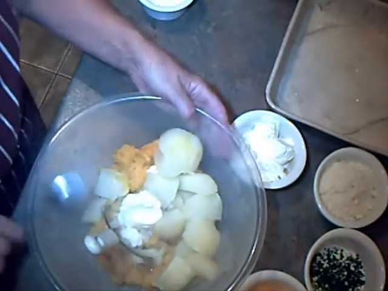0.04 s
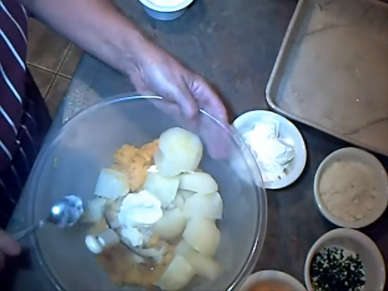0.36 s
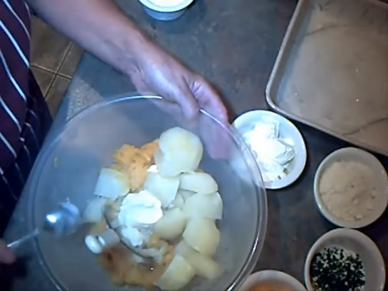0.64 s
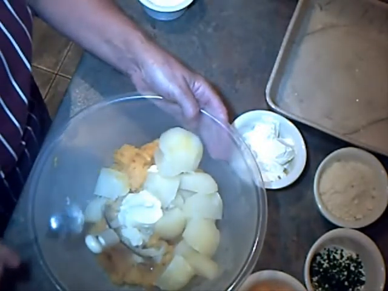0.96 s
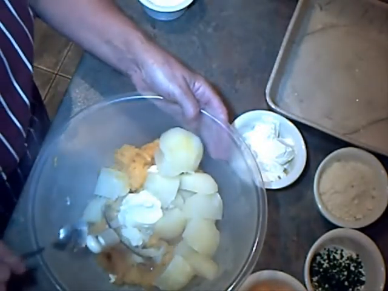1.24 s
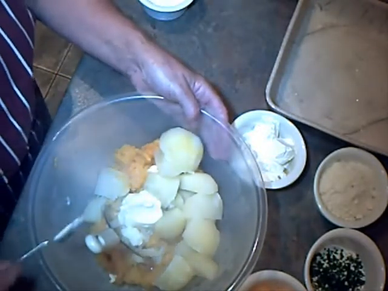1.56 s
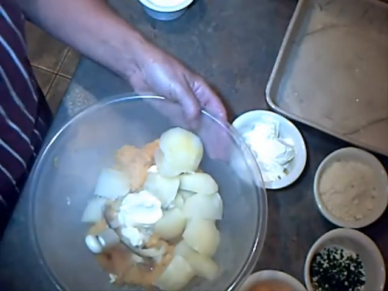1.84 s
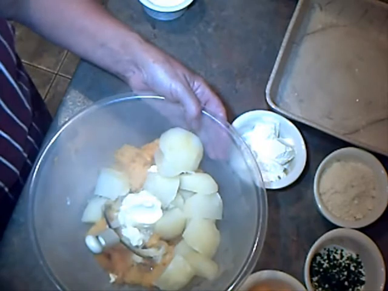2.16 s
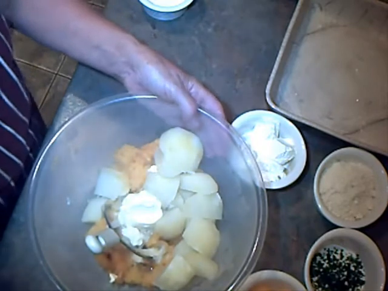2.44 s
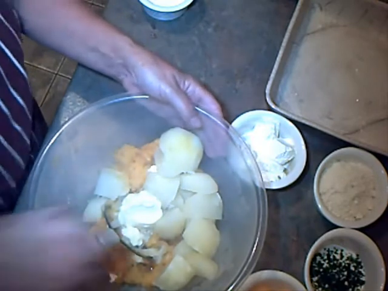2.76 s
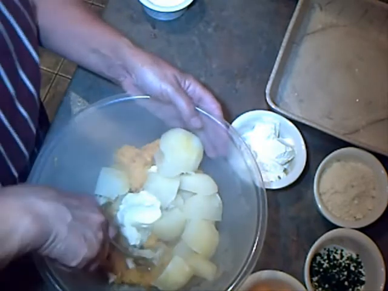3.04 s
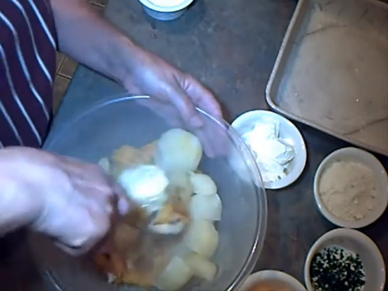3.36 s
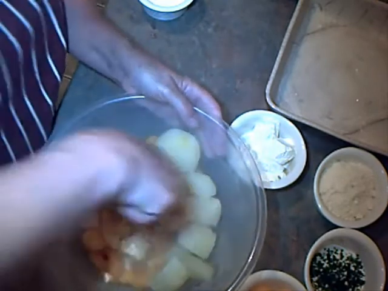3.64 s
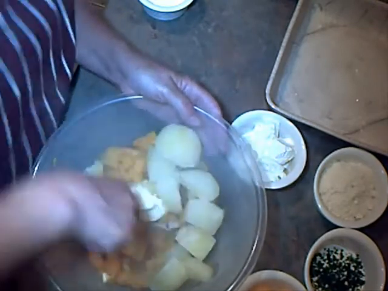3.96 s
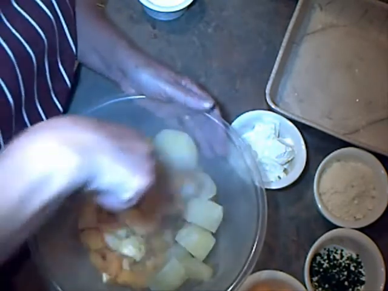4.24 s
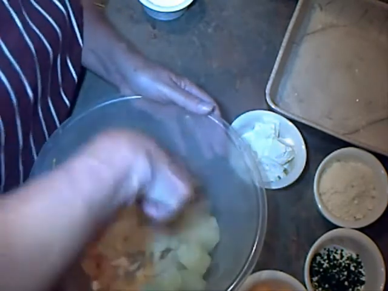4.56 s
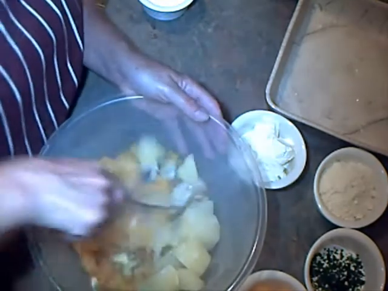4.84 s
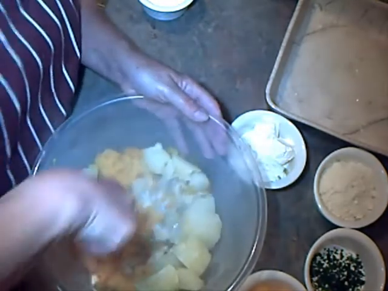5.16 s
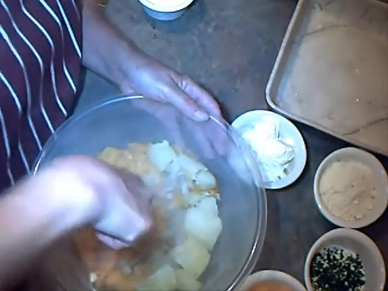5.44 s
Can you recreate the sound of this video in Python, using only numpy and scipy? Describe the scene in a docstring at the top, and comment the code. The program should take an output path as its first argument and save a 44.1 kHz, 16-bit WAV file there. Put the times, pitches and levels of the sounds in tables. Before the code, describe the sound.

In a small, live kitchen, a metal spoon raps seven times on a big glass bowl, its ring damped by boiled vegetables. A faint, thin high whistle follows, then the spoon clacks onto the counter and bounces to rest. A masher squashes the vegetables with soft wet crackles and pops, sometimes knocking the glass. The microphone is close above the bowl, with air noise and a faint appliance hum behind.

```python
"""Seven raps of a spoon ring a big glass bowl, damped by the boiled vegetables inside it.
A thin high whistle sounds once, then the spoon is laid on the counter and bounces to rest.
A masher squashes the vegetables with wet crackles and pops of trapped air, now and then
knocking the bowl. The kitchen is small and live; behind it all are soft low bumps,
steady air noise and the faint hum of an appliance."""
import sys
import numpy as np
from scipy import signal
from scipy.fft import rfft, irfft
from scipy.io import wavfile
from scipy.ndimage import uniform_filter1d

SR = 44100
rng = np.random.default_rng(int(sys.argv[2]) if len(sys.argv) > 2 else 0)


def pcm_store(signal):
    """Save signal as 16-bit PCM."""
    levels = np.round(np.clip(np.atleast_2d(signal), -1, 1) * 32767)
    wavfile.write(sys.argv[1], SR, levels.astype(np.int16).T)


N = 242550
TIME = np.arange(N) / SR


# The spoon's rhythm. Each row: start in seconds, relative strength in dB, low register boost in dB.
SPOON_RAPS = [(0.3058, -3, 4.5), (0.5830, -3.5, 6), (0.772, -8.5, 2), (0.9347, -3.3, 2.5),
              (1.098, -8.5, 2.5), (1.2426, -2.5, 3), (1.3815, -7.5, 3.5)]


def spoon_raps():
    """The spoon strikes the glass with a short contact; harder raps are brighter."""
    blows = [(s, db, low_db, 0, -2, -8.5 + 0.37 * db) for s, db, low_db in SPOON_RAPS]
    return bowl(blows, strength_db=15.0, rise_s=0.0011, fall_s=0.0036, scatter_db=2.0, blur=1.5)


# The voice of the loaded, hand-held bowl. Each row: pitch in Hz, width in Hz, relative level in dB.
BOWL_MODES = [(146, 57.4, 8), (560, 110, 20), (626.5, 80.2, 33.5), (838.6, 131, 21.5), (908.2, 41, 26.5),
              (1256, 151, 20), (1530, 112, 17), (1766, 73, 17.5), (1998, 168, 13), (2232, 105, 19),
              (2419, 91, 25.5), (2665, 102, 17.5), (2880, 90, 13), (2980, 143, 8), (3215, 96, 5.5),
              (4436, 390, -1.5), (4740, 750, 2.5), (6005, 120, 7.5), (6490, 560, 9.5), (8510, 820, 9),
              (9600, 436, 7.5), (10750, 330, -4.5)]
# Edges in Hz of the low, middle, upper and treble registers; the place of contact sets their balance.
REGISTER_EDGES_HZ = [0, 900, 2000, 4500, 12000]
# How the modes answer a blow deep in the bowl. Each row: frequency in Hz, boost or cut in dB.
DEEP_BLOW_COLOUR = [(150, 3.5), (480, 3), (650, 0), (800, -11.5), (1150, 10), (1550, -5.5), (1760, -0.5),
                    (2000, 6), (2400, 5.5), (2800, -9), (4000, 6), (8000, 6)]


def bowl(blows, strength_db, rise_s, fall_s, scatter_db, blur, deep=False):
    """Each blow rings the bowl's damped modes; returns the sound sent to the microphone and walls."""
    direct, to_walls = np.zeros(N), np.zeros(N)
    hz, width, mode_db = np.transpose(BOWL_MODES)
    mode_db = mode_db + (at_hz(DEEP_BLOW_COLOUR, hz) if deep else 0)
    register = np.digitize(hz, REGISTER_EDGES_HZ) - 1
    # neighbouring modes swing in opposite directions, so the knock swells for a moment
    polarity = (-1) ** np.arange(len(hz))
    for s, blow_db, *register_db in blows:
        force = contact(rise_s, fall_s)
        gains = polarity * from_db(mode_db + scatter_db * rng.standard_normal(len(hz)))
        # summed over all directions, the bowl's peaks are broader
        for track, widths in (direct, width), (to_walls, width * blur):
            rings = np.array([g * resonance(force, f, w) for f, w, g in zip(hz, widths, gains)])
            knock = sum(from_db(db) * unit(rings[register == k].sum(axis=0))
                        for k, db in enumerate(register_db))
            add(track, s - .02, from_db(blow_db + strength_db) * unit(knock))
    return np.array([direct, to_walls])


def contact(rise_s, fall_s, grit=3.0, passes=6):
    """A click inside a brief gritty slide, about equally strong at all pitches; it peaks 20 ms in."""
    t = TIME[:SR // 8] - 0.02
    touch = np.exp(-(t / np.where(t < 0, rise_s, fall_s)) ** 2)
    slide = np.diff(rng.standard_normal(len(t)), prepend=0) * touch
    force = (t == 0) + grit * unit(slide)
    for _ in range(passes):
        # even out the spectrum while the force stays confined to the time of touch
        spectrum = rfft(force)
        force = irfft(spectrum / (np.abs(spectrum) + 1e-9), len(t)) * touch ** (1 / passes)
    return force


# The spoon's landing and bounces. Each row: start in seconds, relative strength in dB.
SPOON_BOUNCES = [(2.6445, 1.5), (2.652, -3), (2.680, -4.5), (2.687, -8), (2.704, -17), (2.712, -13)]
# The ring of the steel. Each row: pitch in Hz, relative level in dB, seconds to fall 60 dB.
SPOON_MODES = [(467.7, 1, 0.12), (1287, -11, .09), (1940, -2.5, 0.17), (2474, 1.5, 0.069),
               (4420, -16.5, 0.066), (5380, -17.5, 0.088), (5830, -3.5, 0.089), (6400, -5, 0.12),
               (7700, -5, .1), (8570, -11, 0.084), (8732, -3, .1), (9840, 1, 0.16), (11000, -5, 0.19)]
# The tone of the clack on the counter. Each row: frequency in Hz, relative level in dB.
CLACK_COLOUR = [(100, -33), (300, -11), (550, 3), (950, -2), (1350, 7.5), (1700, -8), (2150, -9.5),
                (2500, 4.5), (3700, -3.5), (6100, 1), (8600, 3), (9700, -1), (10300, -10), (11500, -19)]


def spoon_laid_down(clack_db, clack_t60, ring_db):
    """The spoon bounces to rest; every touch clacks and sets the steel ringing."""
    out, t = np.zeros(N), TIME[:SR // 2]
    hz, mode_db, t60 = np.transpose(SPOON_MODES)[:, :, None]
    for s, touch_db in SPOON_BOUNCES:
        clack = unit(coloured(rng.standard_normal(len(t)), CLACK_COLOUR) * dying(t, clack_t60))
        gains = from_db(mode_db + 2 * rng.standard_normal(hz.shape))
        phase = 2 * np.pi * (hz * t + rng.random(hz.shape))
        ring = np.sum(gains * np.sin(phase) * dying(t, t60), axis=0)
        add(out, s, from_db(touch_db) * (from_db(clack_db) * clack + from_db(ring_db) * ring))
    return out


# The masher hitting glass. Each row: start in seconds, relative strength in dB,
# low and upper register levels in dB against the middle one.
MASHER_KNOCKS = [(3.3146, -43.5, -4, -8), (3.3395, -38.5, -22, -10), (3.916, -22.5, -4, -4.5),
                 (3.952, -31, -6, -18), (4.155, -41, -12, -14), (4.6225, -31, -3.5, -13.5),
                 (4.707, -27, -4.5, 6), (4.7176, -40, -14, 11), (4.772, -38.5, 21, 0),
                 (5.236, -48, -5, -18), (5.301, -46.5, -11, -1), (5.3964, -45, -23, -1),
                 (5.4296, -34, 1, -13)]


def masher_knocks():
    """The masher strikes deep in the bowl, with a longer contact and little treble."""
    blows = [(s, db, low_db, 0, upper_db, -20.5) for s, db, low_db, upper_db in MASHER_KNOCKS]
    return bowl(blows, strength_db=15.5, rise_s=0.0018, fall_s=0.0058,
                scatter_db=3.5, blur=3.1, deep=True)


# The pushes. Each row: moment of greatest pressure in seconds, relative squash and crackle levels in dB.
MASHER_PUSHES = [(3.11, -70.5, -69), (3.355, -62.5, -64), (3.69, -69, -65), (3.924, -51.5, -60),
                 (4.25, -86, -69.5), (4.614, -59.5, -60), (4.72, -58, -63.5), (4.92, -61.5, -69.5),
                 (5.219, -75, -65.5), (5.41, -60.5, -59)]
# The tones of the soft squash and the bright crackle. Each row: frequency in Hz, relative level in dB.
SQUASH_COLOUR = [(200, -11), (450, -4), (700, -6.5), (1150, -6.5), (1700, -9.5), (2400, -4.5), (3300, -13),
                 (6000, -24.5)]
CRACKLE_COLOUR = [(1500, -32), (3500, -7.5), (6000, -11), (9500, -6), (11500, -13)]
MASHING_FROM_S = 3.0


def mash():
    """Soft flesh tears under the masher while its wet skin crackles; the crackle stops sooner."""
    push_s, squash_db, crackle_db = np.transpose(MASHER_PUSHES)
    squash = coloured(wet_grains(446, 3100, per_s=1800, spread_db=4.0, sharpness=2.3), SQUASH_COLOUR)
    crackle = coloured(wet_grains(3000, 10800, per_s=500, spread_db=3.0, sharpness=7.0), CRACKLE_COLOUR)
    squash *= pressure(push_s, squash_db, stir_db=-76, release_s=0.093)
    crackle *= pressure(push_s, crackle_db, stir_db=-77, release_s=0.039)
    return squash + crackle


def wet_grains(lowest_hz, highest_hz, per_s, spread_db, sharpness, count=12):
    """Each tiny cavity that opens in the mash rings briefly at a pitch of its own."""
    pitches = np.geomspace(lowest_hz, highest_hz, count)
    return sum(resonance(clicks(per_s / count, spread_db), hz, hz / sharpness) for hz in pitches)


def clicks(per_s, spread_db):
    """Tiny clicks of uneven size that come in clumps."""
    born = rng.random(N) < per_s * from_db(4 * drift(60)) / SR
    return born * rng.choice([-1, 1], N) * from_db(spread_db * np.minimum(rng.exponential(1, N), 4))


def pressure(push_s, peaks_db, stir_db, release_s, swell_s=0.055):
    """Gain that builds up to each push and relaxes, over the quiet stirring in between."""
    power = from_db(stir_db) ** 2 * (TIME > MASHING_FROM_S)
    for s, db in zip(push_s, peaks_db):
        push = np.exp(-np.abs(TIME - s) / np.where(TIME < s, swell_s, release_s))
        power = power + (from_db(db) * push) ** 2
    return np.sqrt(power)


# The biggest air pockets. Each row: start in seconds, peak level in dB, pitch in Hz.
BIG_POPS = [(3.457, -50, 5770), (4.245, -46, 7700), (4.360, -47, 5740), (4.623, -39, 6900),
            (4.719, -29.5, 3820), (4.766, -37.5, 8360), (5.014, -45, 7450), (5.042, -41, 9530),
            (5.411, -40, 6400)]


def air_pops(t60, width_hz, small_per_s, small_db, count=40):
    """Trapped air spits out of the mash in short squirts; small pockets pop at random."""
    out, t = np.zeros(N), TIME[:SR // 16]
    starts = random_times(small_per_s, MASHING_FROM_S)
    small = [(s, small_db, hz) for s, hz in zip(starts, rng.uniform(4500, 9100, count))]
    for (s, peak_db, hz), air in zip(BIG_POPS + small, rng.standard_normal((count, len(t)))):
        spit = resonance(air * dying(t, t60), hz, width_hz)
        add(out, s, from_db(peak_db) * spit / np.abs(spit).max())
    return out


def counter_shake(at_s, length_s, hz, level_db, rumble_db):
    """The hardest push makes the counter shudder."""
    swell = np.exp(-((TIME - at_s) / length_s) ** 2)
    rumble = coloured(rng.standard_normal(N), [(25, 0), (60, -18), (200, -35), (1000, -70)])
    return swell * (from_db(level_db) * np.sin(2 * np.pi * hz * TIME) + from_db(rumble_db) * rumble)


# The whistle's glide. Each row: time in seconds, pitch in Hz, relative level in dB.
WHISTLE_GLIDE = [(1.549, 5800, -74), (1.595, 6500, -65.5), (1.62, 7100, -77), (1.685, 6820, -69.5),
                 (1.781, 7000, -81), (1.849, 6600, -64), (1.92, 6280, -66), (1.98, 6680, -73.5),
                 (2.06, 7150, -82)]


def whistle(level_db, waver_hz, flutter_db):
    """One thin, faint tone that glides and wavers."""
    s, hz, db = np.transpose(WHISTLE_GLIDE)
    pitch = np.interp(TIME, s, hz) + waver_hz * drift(200)
    gain = np.interp(TIME, s, from_db(db), left=0, right=0) * from_db(level_db + flutter_db * drift(49))
    return np.sqrt(2) * gain * np.sin(2 * np.pi * np.cumsum(pitch) / SR)


def near_echoes(x, t60, lowest_hz):
    """The bowl's wall and the dishes around it scatter the short waves back within a few ms."""
    t = TIME[:SR // 16]
    highpass = signal.butter(2, lowest_hz, "high", fs=SR, output="sos")
    scatter = signal.sosfilt(highpass, rng.standard_normal(len(t)))
    return signal.fftconvolve(x, unit(scatter * dying(t, t60) * (t > 0.001)))[:N]


# The length of the kitchen's reverb. Each row: frequency in Hz, seconds to fall 60 dB.
REVERB_T60 = [(100, 0.34), (600, 0.23), (2000, 0.26), (6000, 0.24), (11000, 0.23)]
# Its tone. Each row: frequency in Hz, boost or cut in dB.
REVERB_COLOUR = [(100, -1.5), (250, 1.5), (390, -3), (550, -4.5), (700, -4.5), (1000, -7), (1600, -4),
                 (2400, -7.5), (3800, 0.5), (7000, -1.5), (11000, 1.5)]


def kitchen_response(first_echo_s, build_up_s, smooth_hz):
    """Dense wall echoes that start after a few ms and linger longest in the bass."""
    t, hz = TIME[:SR], np.arange(SR // 2 + 1)
    white, tail = rfft(rng.standard_normal(SR)), 0
    edges = np.geomspace(50, 12800, 9)
    for low, high in zip(edges, edges[1:]):
        band = irfft(white * (hz >= low) * (hz < high), SR)
        tail = tail + band * dying(t, at_hz(REVERB_T60, np.sqrt(low * high)))
    onset = np.clip((t - first_echo_s) / build_up_s, 0, 1)
    spectrum = rfft(tail * onset)
    # a diffuse field carries about the same power in neighbouring bands
    power = uniform_filter1d(np.abs(spectrum) ** 2, smooth_hz)
    even = spectrum / np.sqrt(power + power.mean() / 1000)
    response = irfft(even * from_db(at_hz(REVERB_COLOUR, hz)), SR) * (t > first_echo_s)
    return response[:SR * 2 // 3]


# The slow ring of the bowl on the counter. Each row: pitch in Hz, width in Hz, relative level in dB.
COUNTER_RING_MODES = [(162.7, 18, 7.5), (231, 2, -12), (212, 2.7, 20), (255.8, 10.8, 26), (273, 8.3, 18.5),
                      (538, 11.6, 2), (633.6, 22.5, -1), (734, 6.6, -3), (753, 8.3, 1), (840, 10.7, 3.5),
                      (937, 8.9, -9), (1203, 39, -1.5)]


def counter_ring(x, lag_s):
    """The bowl's slow low modes ring on against the counter after each knock."""
    late = np.interp(TIME - lag_s, TIME, x, left=0)
    return sum(from_db(db) * resonance(late, hz, width) for hz, width, db in COUNTER_RING_MODES)


def bumps(per_s, level_db, spread_db, hz, length_s):
    """Dull bumps at random moments: a short dip in pressure and a swing back."""
    out, t = np.zeros(N), TIME[:SR // 16]
    bump = -np.sin(2 * np.pi * hz * t) * np.exp(-(t / length_s) ** 4)
    for s, size in zip(random_times(per_s, 0), rng.standard_normal(40)):
        add(out, s, from_db(level_db + spread_db * size) * bump)
    return out


# The tone of the background air. Each row: frequency in Hz, relative level in dB.
AIR_COLOUR = [(12, -47.5), (20, -2.5), (69, -16), (103, -12.5), (124, -15.5), (239, -15.5), (439, -16),
              (475, -16), (785, -17.5), (896, -18.5), (1520, -24), (2710, -24.5), (3930, -32.5),
              (7600, -30.5), (11000, -34), (14300, -87), (22000, -120)]


def room_air(level_db):
    """A steady bed of air noise, strongest in the bass."""
    return from_db(level_db) * coloured(rng.standard_normal(N), AIR_COLOUR)


# The tones of the hum. Each row: pitch in Hz, rms level in dB.
HUM_TONES = [(100, -67.5), (474, -69.5), (517, -87), (2767, -80), (7680, -82.5)]


def appliance_hum(waver_db, pitch_waver):
    """An appliance hums in faint tones, each wavering slightly in pitch and level."""
    out = np.zeros(N)
    for hz, db in HUM_TONES:
        phase = 2 * np.pi * np.cumsum(hz + pitch_waver * np.sqrt(hz) * drift(30)) / SR
        out += np.sqrt(2) * from_db(db + waver_db * drift(28)) * np.sin(phase)
    return out


def from_db(db):
    """Decibels to gain."""
    return 10 ** (np.asarray(db) / 20)


def unit(x):
    """Scale to an energy of one."""
    return x / np.sqrt(np.sum(x ** 2) + 1e-20)


def at_hz(points, hz):
    """Read a table on a log-frequency axis."""
    f, value = np.transpose(points)
    return np.interp(np.log(np.maximum(hz, 1)), np.log(f), value)


def coloured(x, spectrum):
    """Give a noise a spectrum and an rms of one."""
    hz = np.arange(len(x) // 2 + 1) * SR / len(x)
    return unit(irfft(rfft(x) * from_db(at_hz(spectrum, hz)), len(x))) * np.sqrt(len(x))


def drift(per_s):
    """A random wander with a spread of about one."""
    knots = np.arange(0, N / SR + 1, 1 / per_s)
    return np.interp(TIME, knots, rng.standard_normal(len(knots)))


def random_times(per_s, from_s, count=40):
    """Sparse random moments, seldom close together."""
    s = from_s + np.cumsum(rng.gamma(2, 1 / 2, count)) / per_s
    return s[s < N / SR]


def resonance(x, hz, width):
    """Two-pole resonance with a gain of one at its peak; width in Hz."""
    r = np.exp(-np.pi * width / SR)
    feedback = [1, -2 * r * np.cos(2 * np.pi * hz / SR), r * r]
    return signal.lfilter(np.array([1, 0, -1]) * (1 - r * r) / 2, feedback, x)


def dying(t, t60):
    """Envelope that falls 60 dB in t60 seconds."""
    return np.exp(-np.log(1000) * t / t60)


def add(track, s, sound):
    """Mix a sound in at s seconds."""
    at = int(s * SR)
    track[at:at + len(sound)] += sound[:N - at]


def scene():
    """The bowl, right under the microphone, with the spoon and the food in a small live kitchen."""
    glass, glass_to_walls = spoon_raps() + masher_knocks()
    spoon = spoon_laid_down(clack_db=-2.0, clack_t60=0.09, ring_db=-41.5)
    food = from_db(2.0) * mash() + air_pops(t60=0.015, width_hz=860, small_per_s=2.4, small_db=-50.5)
    early = from_db(-5.5) * near_echoes(glass_to_walls + spoon, t60=0.043, lowest_hz=1000)
    response = kitchen_response(first_echo_s=0.0032, build_up_s=0.0071, smooth_hz=63)
    thin_tone = whistle(level_db=-5.0, waver_hz=50.3, flutter_db=2.0)
    reverb_send = glass_to_walls + thin_tone + from_db(-5.5) * food + from_db(-3.0) * spoon
    reverb = signal.fftconvolve(reverb_send, response)[:N]
    boom = from_db(-2.5) * counter_ring(glass, lag_s=0.007)
    low_end = bumps(per_s=4.1, level_db=-57.5, spread_db=3, hz=111.4, length_s=0.008)
    low_end += counter_shake(at_s=4.07, length_s=0.09, hz=14, level_db=-46.0, rumble_db=-54.5)
    background = room_air(level_db=-61.0) + appliance_hum(waver_db=0.8, pitch_waver=0.202)
    return (glass + food + spoon + thin_tone + early + reverb + boom + low_end + background)[None]


def record(dry):
    """The microphone thins the deepest bass and the low middle; the top is cut steeply."""
    scooped = dry - from_db(-3.5) * resonance(dry, hz=382, width=77)
    thinned = signal.sosfilt(signal.butter(1, 12, "high", fs=SR, output="sos"), scooped)
    return signal.sosfilt(signal.ellip(12, .2, 85, 11200, fs=SR, output="sos"), thinned)


dry = scene()
out = record(dry)
pcm_store(out)
```